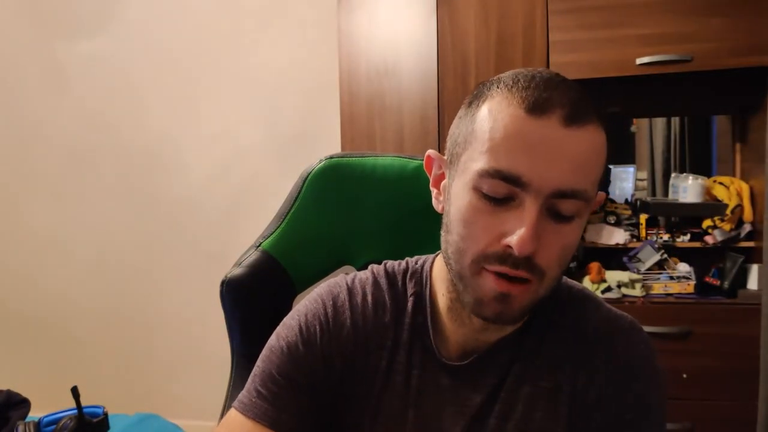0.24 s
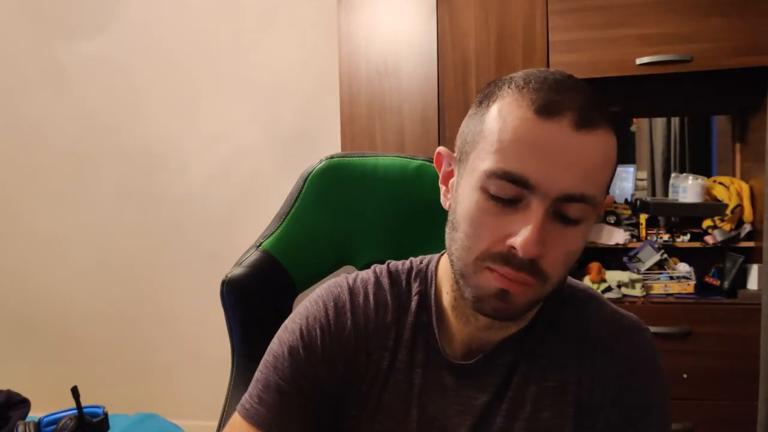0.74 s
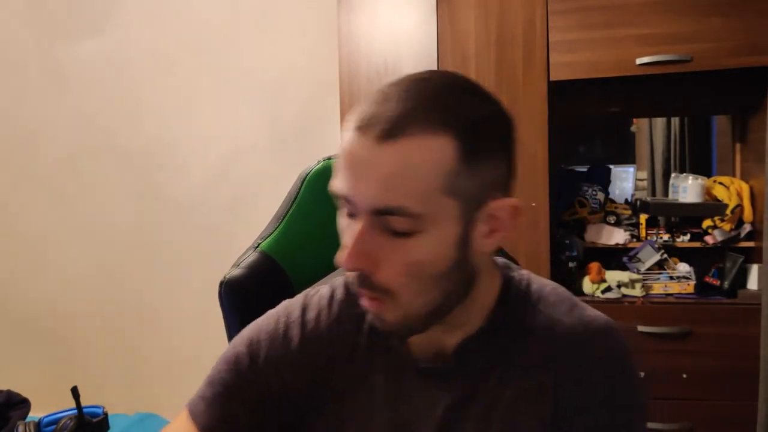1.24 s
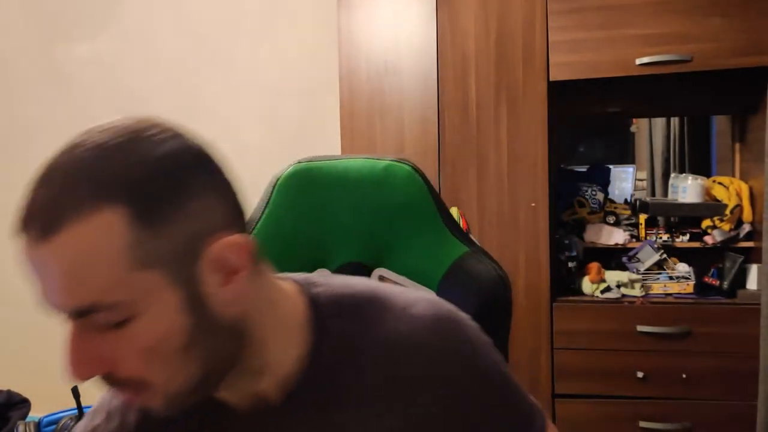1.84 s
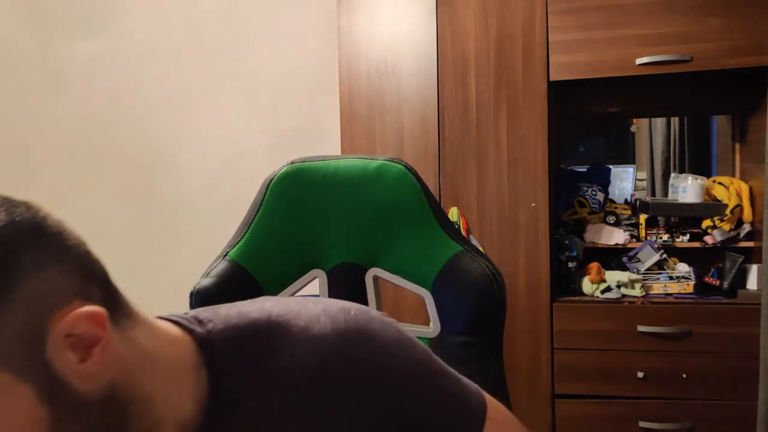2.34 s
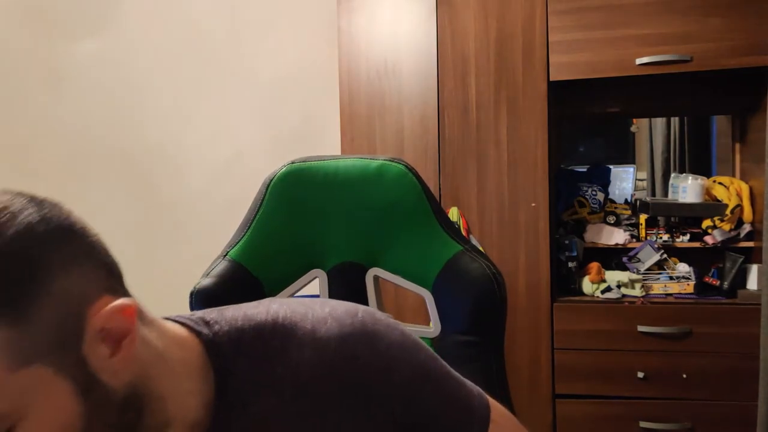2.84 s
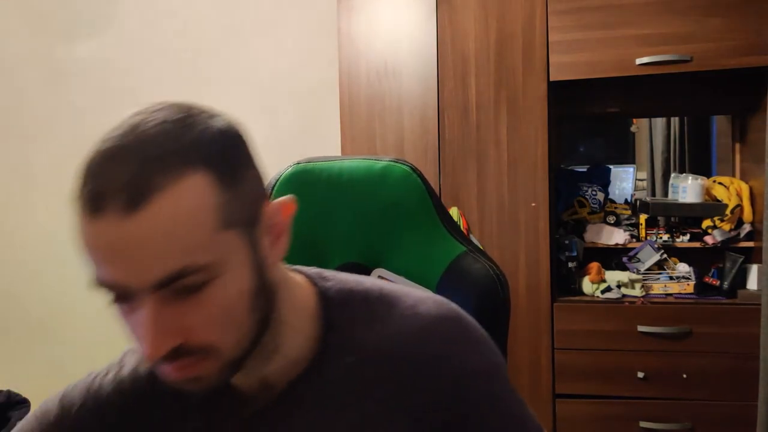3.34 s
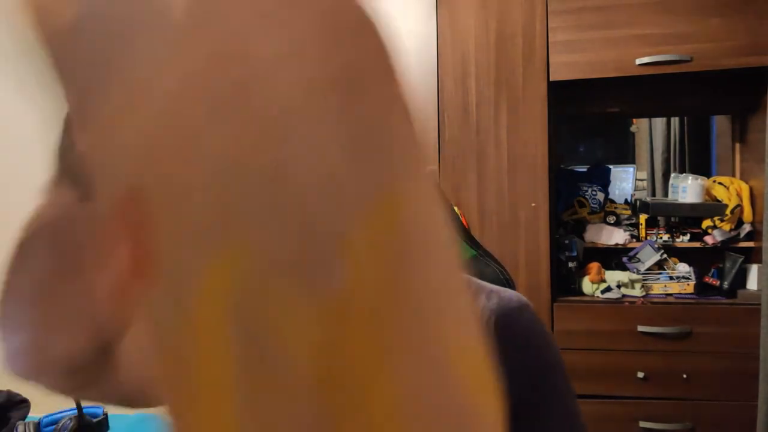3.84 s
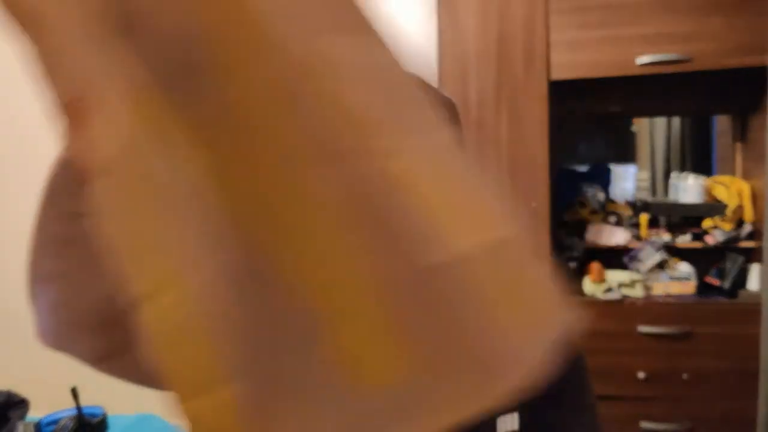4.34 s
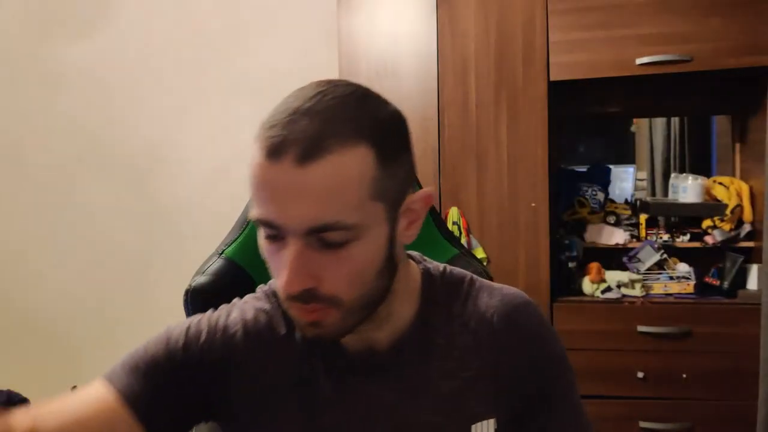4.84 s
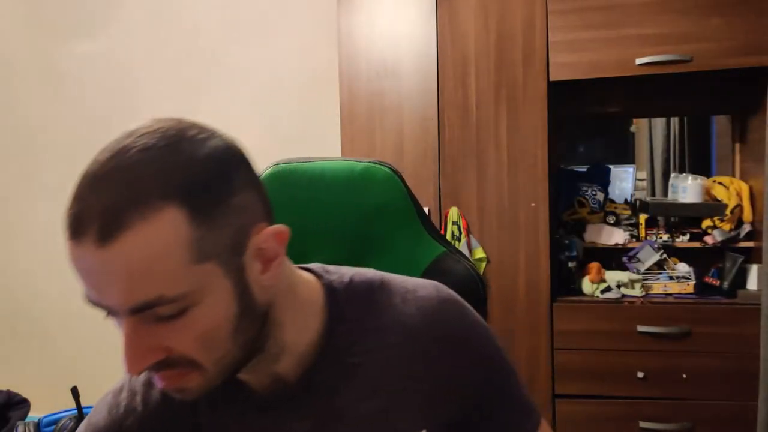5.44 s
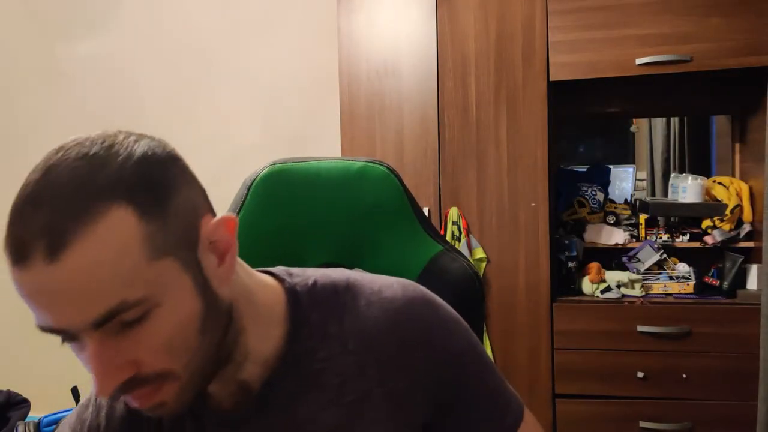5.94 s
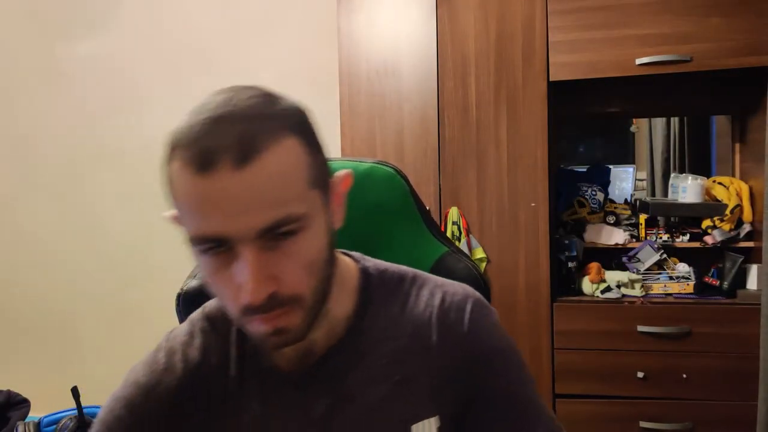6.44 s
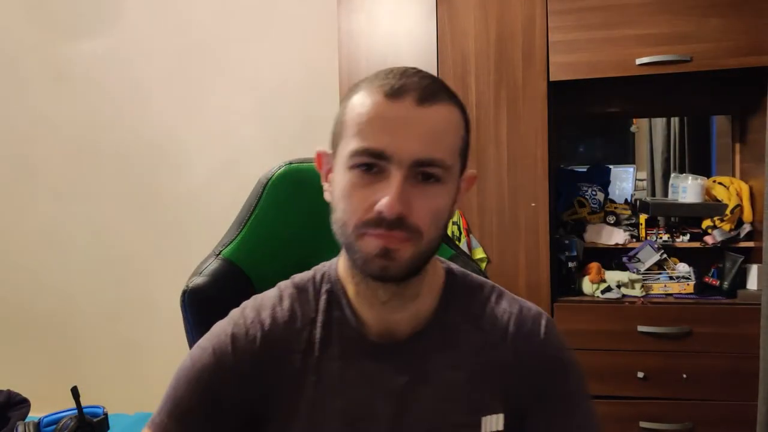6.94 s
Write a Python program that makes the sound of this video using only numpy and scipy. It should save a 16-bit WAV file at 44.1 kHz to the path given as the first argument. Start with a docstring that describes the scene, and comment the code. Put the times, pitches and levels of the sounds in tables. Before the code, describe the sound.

A paper takeaway bag is crunched loudly close to the microphone, briefly rustled, then swung past with a papery rattle and air thump before settling quiet.

```python
"""In a small furnished room a paper takeaway bag is gripped, lifted close past the microphone and set down.
Creases buckle in swarms of tiny snaps, plus single loud pops; broad panels add a duller rattle.
Both are noise bands gated by the handling. Short resonant ticks join them, and dense echoes follow.
Clothes rub on a chair, air and room rumble, and two hums and a hush stay steady behind.
Each of the two microphone ports rings at its own pitch."""
import sys
import numpy as np
from scipy import signal
from scipy.fft import rfft, irfft
from scipy.io import wavfile
from scipy.ndimage import uniform_filter1d

SR = 44100
rng = np.random.default_rng(int(sys.argv[2]) if len(sys.argv) > 2 else 0)


def inscribe(sig):
    """Save sig as 16-bit PCM at rate SR to the path in sys.argv[1].

    A 1-D sig is mono; a 2-D sig holds one channel per row.
    Samples are clipped to [-1, 1] before scaling.
    """
    pcm = np.round(np.clip(np.atleast_2d(sig).T, -1, 1) * 32767)
    wavfile.write(sys.argv[1], SR, pcm.astype(np.int16))


N = 317520
TIME = np.arange(N) / SR
EDGES = np.geomspace(20, 18000, 21)   # band edges, Hz
CENTRES = np.sqrt(EDGES[1:] * EDGES[:-1])

# Levels in the tables are relative: layer trims, room and ports act after them.
# Steady hums in the room: (frequency [Hz], width of each of two filter passes [Hz], level [dB])
HUMS = [(50.9, 5.8, -58.5), (481, 48, -75)]
# The sitter leans and clothes rub on the chair: (middle [s], half length [s], level [dB])
LEANS = [(.43, .04, -45.5), (.7, 0.12, -52), (1.55, 0.15, -49.5), (2.33, 0.096, -52), (3.35, 0.3, -65),
         (3.76, 0.042, -47.5), (3.93, 0.049, -45), (4.28, .11, -43), (4.82, .1, -56.5), (5.09, 0.03, -59),
         (5.36, 0.037, -64), (6.05, 0.027, -54.5), (6.55, 0.089, -69.5)]
# The swinging bag pushes air at the microphone: (middle [s], half length [s], level [dB])
SWINGS = [(2.42, 0.062, -44), (3.9, 0.2, -37.5), (4.28, 0.089, -34), (4.75, 0.35, -47.5),
          (6.08, 0.093, -46)]
# Each squeeze or shift: gripped and scrunched, pulled closer and fingered, lifted past the microphone,
# set down and let go:
# (full strength [s], rise [s], hold [s], crease crackle [dB], panel rattle [dB], crackle tilt [dB/octave])
SQUEEZES = [ (0.021, 0.0082, 0.0072, -56, -68, 2.5), (0.416, 0.04, 0.087, -29, -36.5, 0.5),
            (0.585, 0.094, 0.18, -29.5, -38, 0.5), (0.919, 0.16, 0.096, -27.5, -36.5, -2.5),
            (1.167, 0.24, 0.096, -31.5, -43, -0.5), (1.402, 0.059, 0.026, -34.5, -40.5, -0.5),
            (1.58, .1, .06, -59.5, -52, 3), (1.812, 0.029, .04, -50, -59, 1),
            (2.081, 0.057, 0.037, -55.5, -58, 3.5), (2.297, 0.13, 0.02, -33.5, -43, 2.5),
            (2.391, 0.028, 0.018, -40.5, -51, -4), (2.502, 0.027, 0.0083, -53.5, -63, -4.5),
            (2.746, .15, .01, -55, -60.5, -1.5), (2.88, 0.08, 0.023, -50.5, -51, -5),
            (3.023, 0.077, 0.088, -55, -58, 3), (3.37, 0.59, 0.018, -64.5, -62, 0),
            (3.503, 0.034, 0.011, -51.5, -54.5, -5.5), (3.728, 0.21, 0.018, -46.5, -45, -3.5),
            (3.879, 0.051, .13, -38.5, -35.5, -1.5), (4.243, 0.2, 0.013, -32, -29.5, -4),
            (4.341, 0.047, 0.043, -36, -39.5, -1), (4.477, 0.04, 0.0078, -38.5, -43.5, -1),
            (4.873, 0.12, .1, -54.5, -51, -1), (5.068, 0.12, 0.15, -57.5, -62.5, 0.5),
            (5.326, 0.093, 0.1, -64, -64.5, 3), (5.498, 0.022, 0.0073, -58.5, -65, -5),
            (5.905, 0.096, .04, -58.5, -58.5, 2.5), (6.022, 0.0067, 0.011, -38.5, -45, -3),
            (6.105, .03, .025, -53, -54, -5.5), (6.21, 0.082, 0.14, -59, -68.5, -2),
            (6.444, 0.21, 0.53, -64, -87, 3.5)]
# Light handling mostly slides the sheets, hard handling buckles them:
# (crackle level [dB], share of smooth sliding [0-1])
SLIDING = [(-62, .72), (-52, .33), (-42, .14), (-30, .08)]
# The loudest single creases:
# (time [s], crack [dB], panel thump [dB], crack's buckling time [s], crack tilt [dB/octave])
POPS = [(0.235, -52, -73, .0045, -4.5), (0.364, -48.5, -47.5, 0.0088, -1), (.4156, -26, -33, .0057, -6.5),
        (0.5319, -20.5, -43, 0.0022, 5), (0.6896, -25.5, -44, 0.01, -2), (0.7501, -16.5, -51, 0.0032, -0.5),
        (0.7618, -21, -48, .0025, -1), (0.793, -17.5, -43, 0.0023, 0), (0.8805, -16.5, -35, 0.0029, 1),
        (.938, -26, -40, 0.0051, -6), (.9803, -23, -47, 0.0072, -3), (1.006, -20, -51, 0.0045, -2),
        (1.101, -23, -36.5, 0.0018, -3), (1.246, -23.5, -35.5, .0057, 4), (1.3028, -31, -50, 0.0018, 7),
        (1.3493, -32, -58, 0.0027, 1), (1.3801, -28, -47, 0.003, -2), (1.436, -26, -44, 0.0085, 0.5),
        (1.8142, -31.5, -56, 0.0032, 5), (1.859, -38, -56, 0.0046, 2.5), (2.235, -38.5, -58, .0057, 0),
        (2.393, -35, -43, 0.0042, 2), (2.747, -51, -53, .005, -9.5), (2.8468, -44.5, -52, 0.0039, 6),
        (3.031, -45, -60, .003, 2), (3.6227, -34.5, -42.5, 0.0042, -3.5),
        (3.7517, -29.5, -35.5, 0.0025, -3.5), (3.809, -34.5, -39, 0.0044, -1.5),
        (3.8548, -38, -37.5, 0.0043, -6), (3.8665, -31, -33.5, 0.006, -2.5), (3.9434, -37, -31, .0024, -11),
        (3.9764, -16.5, -38, 0.0024, 0), (4.0364, -35, -35, 0.004, -1), (4.0906, -33.5, -42, 0.0049, -4.5),
        (4.122, -39, -37, 0.0024, -3.5), (4.546, -41, -42, 0.0055, -10), (4.6893, -44, -65, 0.0036, -6),
        (4.7794, -27, -32, 0.002, 2), (4.9373, -39, -55, 0.0027, -1.5), (5.073, -40, -48, 0.0044, 1),
        (5.15, -40, -57, 0.0018, 1.5), (5.4657, -40.5, -42.5, 0.0032, 5.5), (5.508, -47.5, -51, 0.0051, -2),
        (6.024, -32.5, -39, 0.006, 2), (6.04, -32, -43, .003, -3)]
# Where the bag is held: (time [s], left minus right [dB])
BAG_SIDE = [(0, -0.5), (.7, -1.5), (1.3, 2), (1.8, 2), (2.4, 2.5), (3.2, 2.5), (3.8, -0.5), (4.4, -0.5),
            (5.0, 2.5), (6.1, 3)]
# Pitched ticks and soft bumps:
# (time [s], frequency [Hz], width of each of two filter passes [Hz], level [dB], decay [s])
TICKS = [(1.379, 3960, 1190, -32, 0.046), (3.244, 600, 910, -56.5, 0.036), (3.623, 1060, 350, -42, 0.0092),
         (3.943, 2340, 1000, -22.5, 0.0022), (4.123, 1090, 350, -33, 0.0047),
         (4.779, 1550, 600, -39.5, 0.005), (6.429, 563, 444, -59, 0.047), (6.52, 510, 400, -65, 0.03),
         (6.787, 4040, 1200, -55.5, 0.01), (6.826, 2180, 700, -52.5, 0.016),
         (6.826, 4000, 1200, -52, 0.0079)]
# Spectra of paper creases, paper panels, rubbing cloth, rumble and room hush:
# (frequency [Hz], relative density [dB])
CREASE_COLOUR = [(200, -63), (800, -49), (1500, -7.5), (2500, -0.5), (5000, 1.5), (8000, 3), (11000, -1),
                 (16000, -1)]
PANEL_COLOUR = [(100, -27.5), (250, -7), (450, -3.5), (700, -1), (1000, 2.5), (1500, -1.5), (2300, -1),
                (4000, -5), (12000, -35)]
CLOTH_COLOUR = [(50, -9), (90, -9), (160, 0), (300, -5), (500, -6.5), (900, -17.5), (2000, -10.5),
                (8000, -25)]
RUMBLE_COLOUR = [(22, -1), (32, 6.5), (45, -6), (62, -2.5), (85, -16.5), (110, -11.5), (300, -38)]
HUSH_COLOUR = [(25, -16), (36, 0), (52, -25), (75, -66), (130, -6), (280, -11.5), (480, -10), (800, -14.5),
               (1600, -19.5), (4000, -18), (9000, -31.5), (16000, -17)]
# Likeness of the two channels: (frequency [Hz], correlation [0-1])
LIKENESS = [(30, 0.56), (60, 1), (130, 0.78), (300, 0.64), (640, 0.53), (1400, 0.056), (3000, 0),
            (15000, 0)]
# Response of each microphone port: (frequency [Hz], gain [dB])
LEFT_PORT = [(100, 0.5), (1000, 1), (2200, -2.5), (3600, -3.5), (4500, -8.5), (5300, -15), (6100, -9.5),
             (7000, -1.5), (7600, 5), (8200, 7), (9000, 3.5), (10200, -2), (15500, -7.5)]
RIGHT_PORT = [(100, 2.5), (1000, 3.5), (2200, 1), (3600, 3), (4200, 5.5), (4800, 8.5), (5300, 13.5),
              (5700, 4.5), (6300, -1.5), (7400, -13), (8400, -21.5), (10000, -16.5), (12500, -11),
              (15500, -6)]

RISE_DB, RISE_CURVE = 20, 1.16   # a squeeze is 20 dB down one rise time early; curve above 1 steepens its start
RELEASE_DB_PER_S = 176   # the crackle dies when the fingers stop
RELAX_DB, RELAX_DB_PER_S = -20, 40.5   # then the bent paper slowly relaxes
FIRM_GRIP_DB = -42   # crackle level at which snaps come at their normal rate
CREASE_DECAY_S, PANEL_DECAY_S = 0.0013, 0.0055
FOLDS_PER_S, FOLD_SHARE, FOLD_DECAY_S = 90, 0.32, 0.003
ROOM_T60_LOW_S = 0.15   # reverberation time towards the lowest pitches
CUTOFF_HZ = 15900


def from_db(db):
    """Decibels to gain."""
    return 10 ** (np.asarray(db) / 20)


def at_hz(points, hz):
    """Read a table on a log-frequency axis."""
    table = np.array(points)
    return np.interp(np.log(hz), np.log(table[:, 0]), table[:, 1])


def band_gains(colour):
    """Gain of each band, such that the bands together have unit power."""
    gains = from_db(at_hz(colour, CENTRES))
    power = np.sum(gains ** 2 * np.diff(EDGES)) * 2 / SR
    return gains / np.sqrt(power)


def flicker(per_s, spread_db):
    """A gain that wanders at random; mean power 1."""
    steps = rng.standard_normal(N // 20)
    wander = np.interp(TIME * per_s, np.arange(len(steps)), steps)
    gain = from_db(spread_db * wander)
    return gain / np.sqrt(np.mean(gain ** 2))


def swells(rows):
    """Power of movements that grow and fade smoothly."""
    return sum(from_db(db) ** 2 * np.exp(-((TIME - s) / half_s) ** 2) for s, half_s, db in rows)


def banded_noise(envelopes, size=N):
    """Stereo noise, gated by one envelope a band and then filtered, so that nothing sounds early."""
    out = np.zeros((2, size))
    white = rng.standard_normal((2, 2, size))
    for k, envelope in enumerate(envelopes):
        mid, side = white[k % 2]   # neighbouring bands use different noise
        alike = np.clip(at_hz(LIKENESS, CENTRES[k]), -1, 1)
        shared = np.sqrt((1 + alike) / 2) * mid
        opposed = np.sqrt((1 - alike) / 2) * side * [[1], [-1]]
        band = signal.butter(2, EDGES[k:k + 2], "band", fs=SR, output="sos")
        out += signal.sosfilt(band, (shared + opposed) * envelope + 1e-18)
    return out


def resonant_noise(hz, width_hz):
    """Noise held in one resonance by two passes of a peak filter; rms 1."""
    peak = signal.iirpeak(hz, hz / width_hz, fs=SR)
    noise = signal.lfilter(*peak, rng.standard_normal(N + SR))
    noise = signal.lfilter(*peak, noise)[SR:]   # drop the build-up
    return noise / np.std(noise)


def hums():
    """Steady hums of the room, each a noise-fed resonance."""
    return sum(from_db(db) * resonant_noise(hz, width_hz) for hz, width_hz, db in HUMS)


def cloth(sitting_db=-72, level_db=5.0, patchy_db=0.5, catch_db=7.0):
    """Dull rubbing that catches and slips as the sitter leans, with faint rubbing between."""
    level = np.sqrt(swells(LEANS) + from_db(sitting_db) ** 2)
    level = level * from_db(level_db) * flicker(22, catch_db)
    return [level * gain * flicker(25, patchy_db) for gain in band_gains(CLOTH_COLOUR)]


def rumble(room_db=-55, level_db=-5.5):
    """Low noise of the room, swelling as the swinging bag pushes air at the microphone."""
    level = np.sqrt(swells(SWINGS) + from_db(room_db) ** 2) * from_db(level_db)
    return [level * gain for gain in band_gains(RUMBLE_COLOUR)]


def background(hush_db=-60):
    """Rubbing, rumble and the steady hush of the room, added as power in each band."""
    hush = from_db(hush_db) * band_gains(HUSH_COLOUR)
    layers = zip(cloth(), rumble(), hush)
    return banded_noise([np.sqrt(rub ** 2 + low ** 2 + still ** 2) for rub, low, still in layers])


def handling():
    """Crackle dB, rattle dB and tilt: every squeeze builds up, holds, stops and leaves the paper relaxing."""
    crease = panel = tilted = 1e-12
    for s, rise_s, hold_s, crease_db, panel_db, tilt in SQUEEZES:
        early = np.maximum(s - TIME, 0)
        late = np.maximum(TIME - s - hold_s, 0)
        release_db = np.maximum(-RELEASE_DB_PER_S * late, RELAX_DB - RELAX_DB_PER_S * late)
        rise_db = -RISE_DB * (early / rise_s) ** RISE_CURVE
        power = from_db(np.maximum(release_db + rise_db, -100)) ** 2
        crackle = power * from_db(crease_db) ** 2
        crease = crease + crackle
        panel = panel + power * from_db(panel_db) ** 2
        tilted = tilted + crackle * tilt
    return 10 * np.log10(crease), 10 * np.log10(panel), tilted / crease


def die_away(energy, decay_s):
    """Spread each packet of energy over an exponential tail; decay_s is that of the amplitude."""
    r = np.exp(-2 / (decay_s * SR))
    return signal.lfilter([1 - r], [1, -r], energy)


def buckling(per_s, size_db, even_s):
    """Energy of tiny snaps at random moments, evened out to a local mean near 1.
    Positive size_db gives a few larger snaps, negative a few smaller ones."""
    sizes = from_db(size_db * np.minimum(rng.exponential(1, N), 4)) ** 2
    energy = sizes * (rng.random(N) < per_s / SR)
    local = uniform_filter1d(energy, int(even_s * SR))
    return energy / (local + np.mean(energy) / 10)


def pop_power(column, length_scale, octaves):
    """Power of the loud pops: each fold crackles along its length, then stops.
    octaves is the band's height, on which each pop's tilt acts."""
    age = TIME[:SR // 20]
    out = np.zeros(N + SR // 20)
    for pop in POPS:
        at, length_s, tilt = round(pop[0] * SR), pop[3] * length_scale, pop[4]
        shape = (1 - np.exp(-16 * age / length_s)) / (1 + (age / length_s) ** 5)
        out[at:at + len(age)] += from_db(pop[column] + tilt * octaves) ** 2 * shape
    return out[:N]


def bag(snaps_per_s=700, size_db=-3.0, fold_spread_db=0.6, crease_db=2.5, panel_db=-1.0,
        crack_db=2.8, thump_db=0.5, thump_length_scale=1.26, facet_db=4.0, pop_facet_db=1.5):
    """Every snap cracks along its crease and shakes the panel beside it; sheets also slide on each other."""
    crease, panel, tilt = handling()
    slide = np.interp(crease, *np.transpose(SLIDING))
    # harder handling, more snaps
    rate = snaps_per_s * from_db(0.32 * (crease - FIRM_GRIP_DB))
    snaps = buckling(rate, size_db, even_s=0.034)
    # now and then a longer fold gives way
    folds = die_away(buckling(FOLDS_PER_S, fold_spread_db, even_s=0.067), FOLD_DECAY_S)
    snaps = (1 - FOLD_SHARE) * snaps + FOLD_SHARE * folds
    crackle = slide + (1 - slide) * die_away(snaps, CREASE_DECAY_S)
    crackle = crackle * from_db(crease + crease_db) ** 2
    rattle = slide + (1 - slide) * die_away(snaps, PANEL_DECAY_S)
    rattle = rattle * from_db(panel + panel_db) ** 2
    thumps = from_db(thump_db) ** 2 * pop_power(2, thump_length_scale, 0)
    envelopes = []
    for hz, bright, dull in zip(CENTRES, band_gains(CREASE_COLOUR), band_gains(PANEL_COLOUR)):
        octaves = np.log2(max(hz, 2200) / 6000)   # tilts pivot at 6 kHz and level off below 2.2 kHz
        swarm = (bright * from_db(tilt * octaves)) ** 2 * crackle + dull ** 2 * rattle
        cracks = (bright * from_db(crack_db)) ** 2 * pop_power(1, 1, octaves)
        pops = cracks + dull ** 2 * thumps
        # facets of all sizes take turns, so each snap has a colour of its own
        swarm = swarm * flicker(160, facet_db) ** 2
        pops = pops * flicker(160, pop_facet_db) ** 2
        envelopes.append(np.sqrt(swarm + pops))
    side_db = np.interp(TIME, *np.transpose(BAG_SIDE))
    return banded_noise(envelopes) * from_db(side_db * np.array([[0.5], [-0.5]]))


def room(x, first_echo_s=0.00401, damping_hz=11000):
    """Dense echoes from desk, wardrobe and walls, as decaying noise; the treble dies first."""
    age = TIME[:SR // 2]
    envelopes = []
    for hz in CENTRES:
        fall_db = -60 * age * (1 + hz / damping_hz / 2) / ROOM_T60_LOW_S
        envelopes.append(from_db(fall_db) * (age > first_echo_s))
    tail = banded_noise(envelopes, size=len(age))
    tail = tail / np.sqrt(np.sum(tail ** 2, axis=1, keepdims=True))
    return signal.fftconvolve(x, tail, axes=1)[:, :N]


def ticks():
    """Short knocks, each a sudden noise burst dying away in one broad resonance."""
    out = np.zeros(N)
    for s, hz, width_hz, db, decay_s in TICKS:
        fade = (TIME > s) * np.exp(-np.abs(TIME - s) / decay_s)
        out += from_db(db) * resonant_noise(hz, width_hz) * fade
    return out


def scene(room_db=-8.5):
    """The bag and ticks close to the microphone, their echoes, the background and the hums of the room."""
    near = bag() + ticks()
    return near + from_db(room_db) * room(near) + background() + hums()


def port(x, response):
    """A microphone port as a causal (minimum-phase) filter: its resonance rings after every click."""
    size = 2048
    hz = np.maximum(np.arange(size // 2 + 1) * SR / size, 1)
    cepstrum = irfft(np.log(from_db(at_hz(response, hz))))
    folded = np.r_[cepstrum[0], 2 * cepstrum[1:size // 2]]   # folding makes it minimum-phase
    impulse = irfft(np.exp(rfft(folded, size)))
    return signal.fftconvolve(x, impulse)[:N]


def record(dry):
    """Each microphone port colours its channel; a steep low-pass cuts the top."""
    heard = np.array([port(dry[0], LEFT_PORT), port(dry[1], RIGHT_PORT)])
    low_pass = signal.ellip(12, 0.1, 80, CUTOFF_HZ, fs=SR, output="sos")
    return signal.sosfilt(low_pass, heard)


dry = scene()
out = record(dry)
inscribe(out)
```